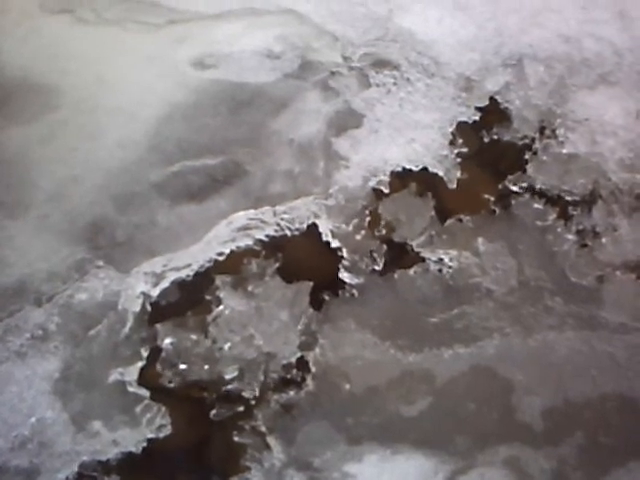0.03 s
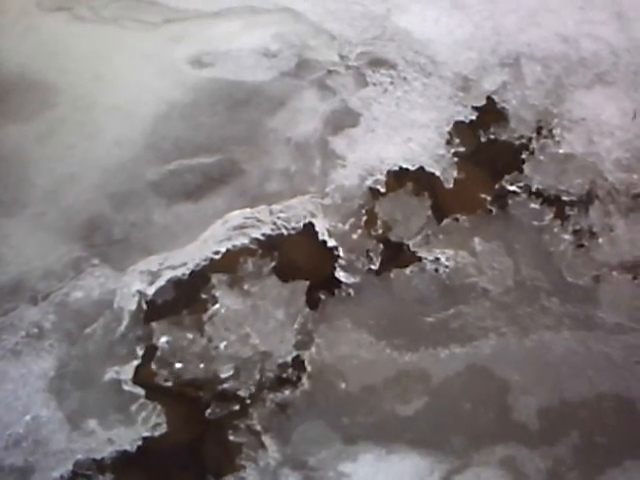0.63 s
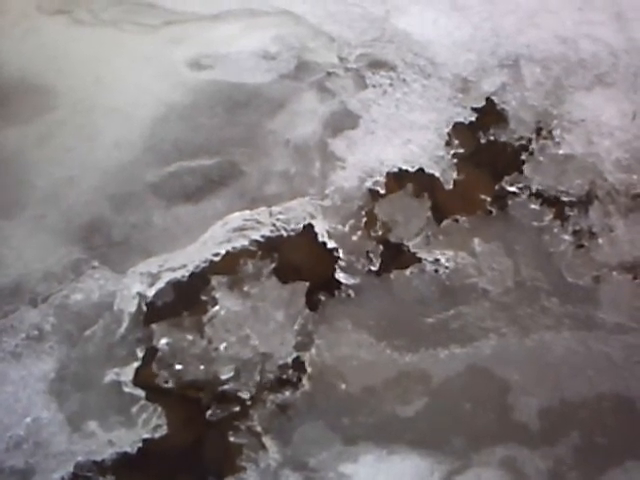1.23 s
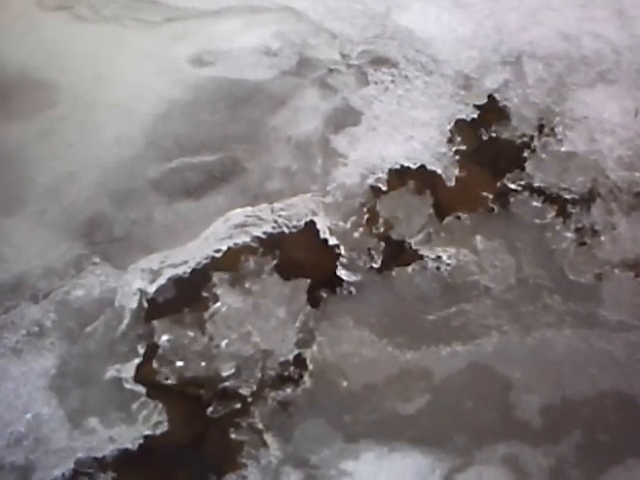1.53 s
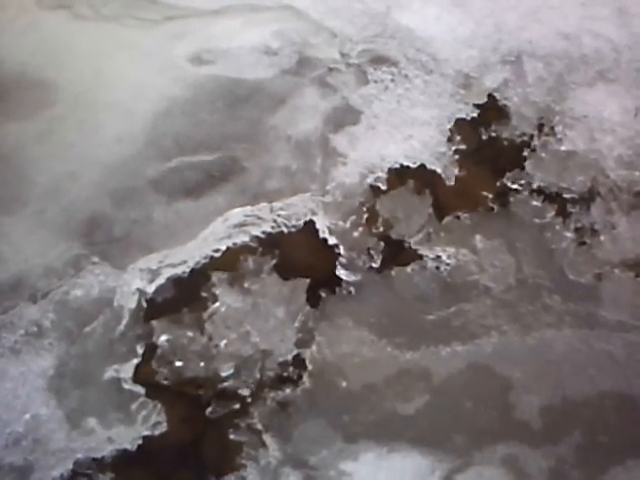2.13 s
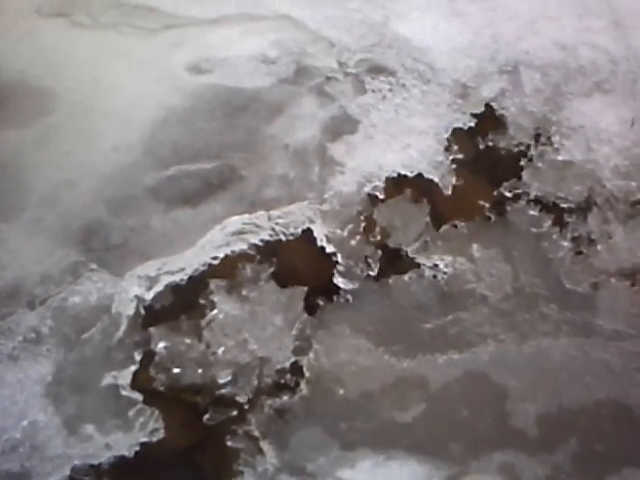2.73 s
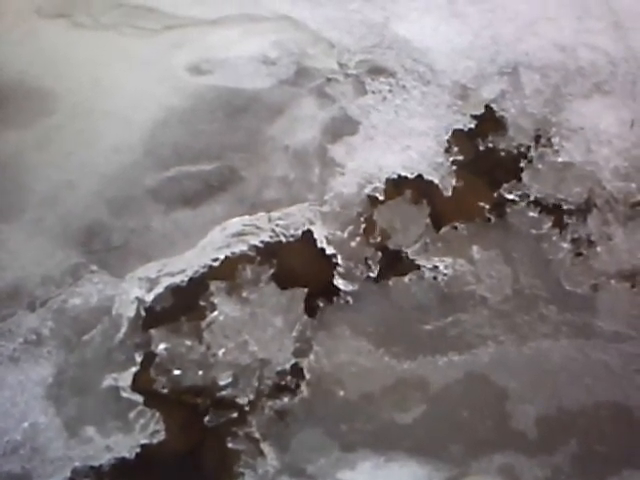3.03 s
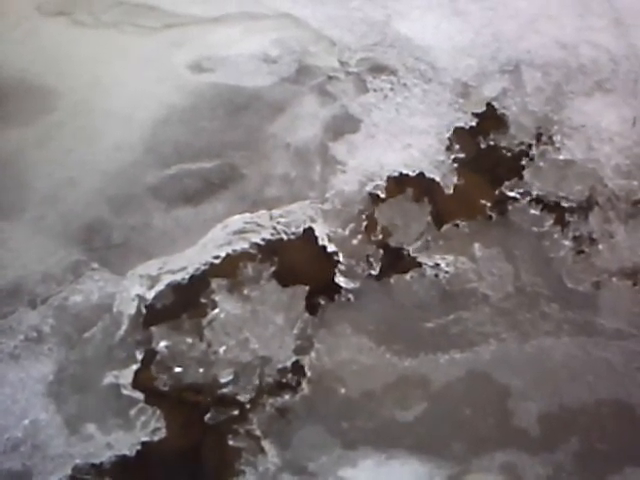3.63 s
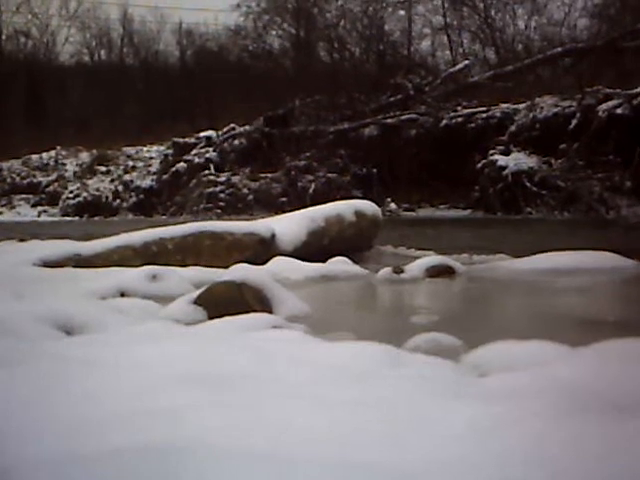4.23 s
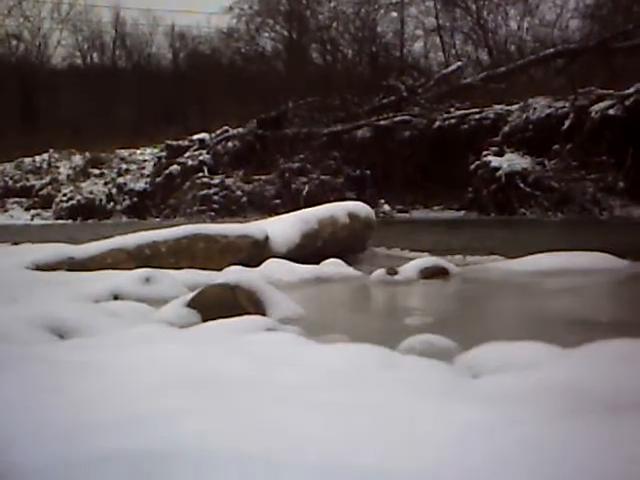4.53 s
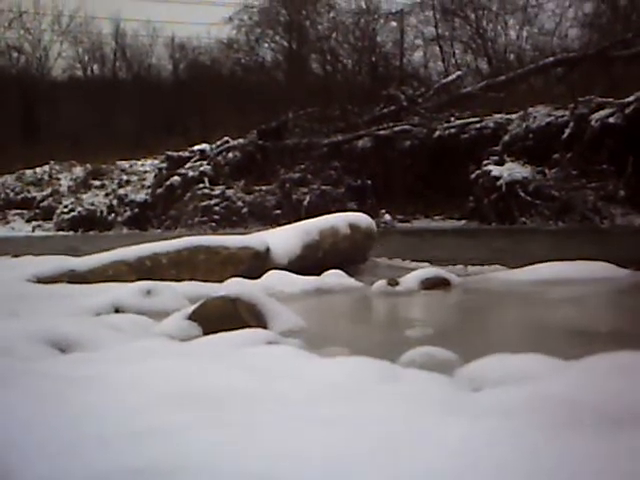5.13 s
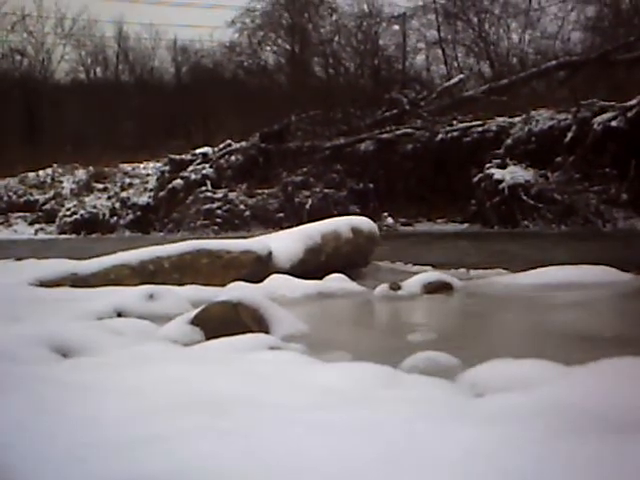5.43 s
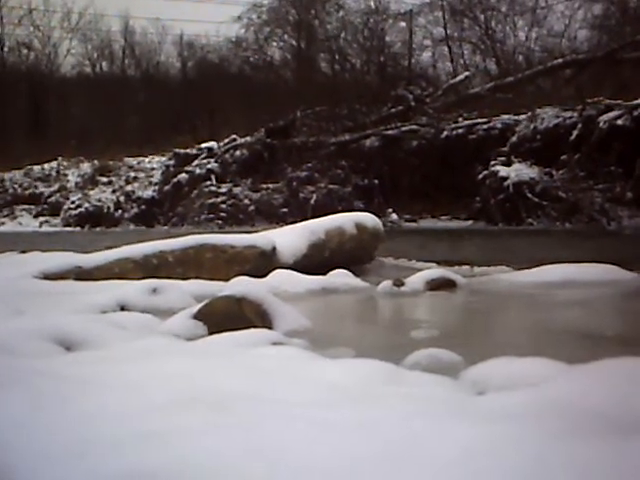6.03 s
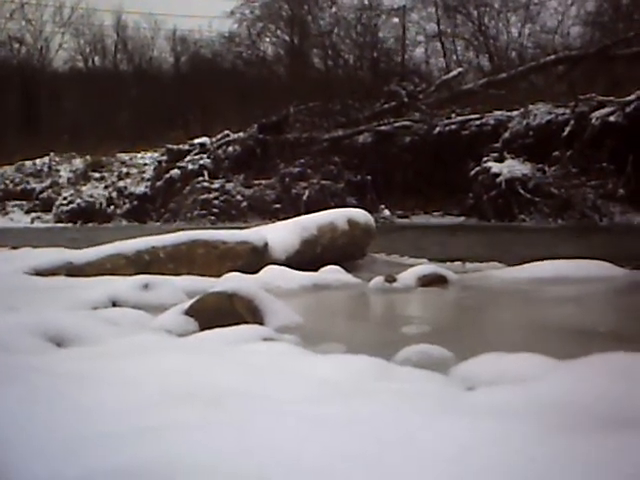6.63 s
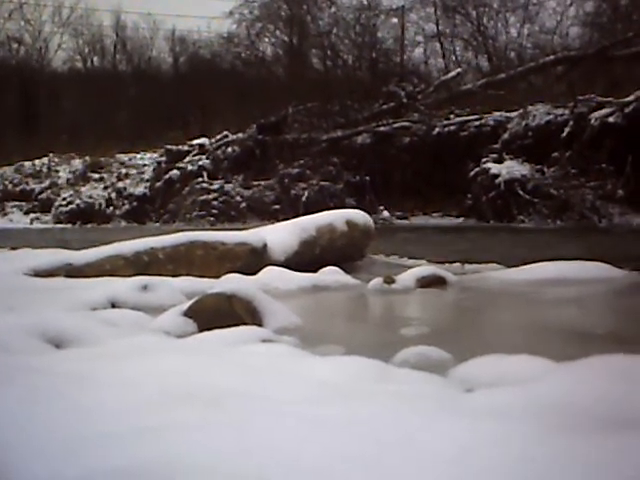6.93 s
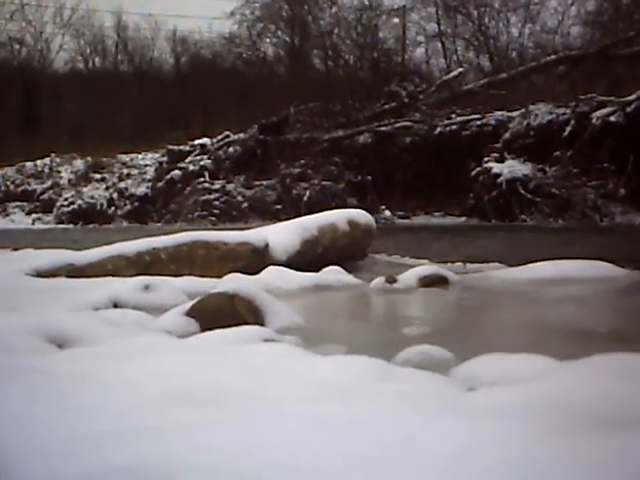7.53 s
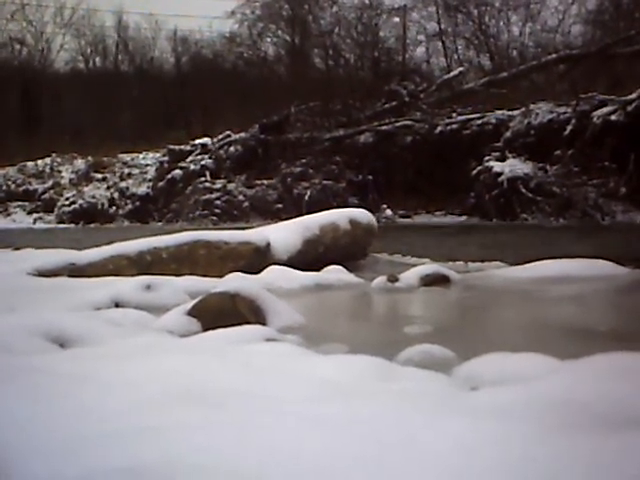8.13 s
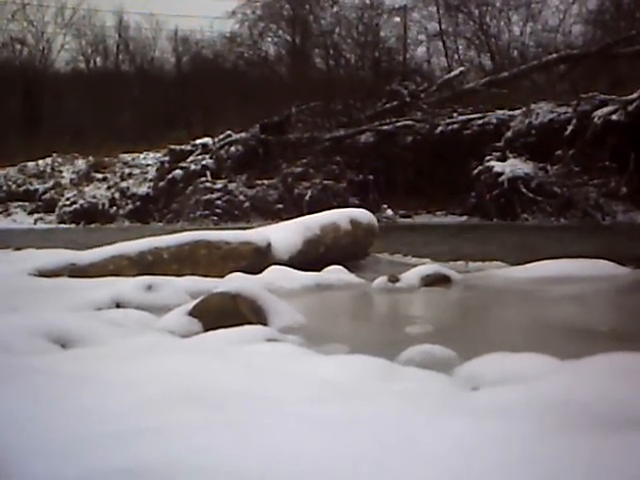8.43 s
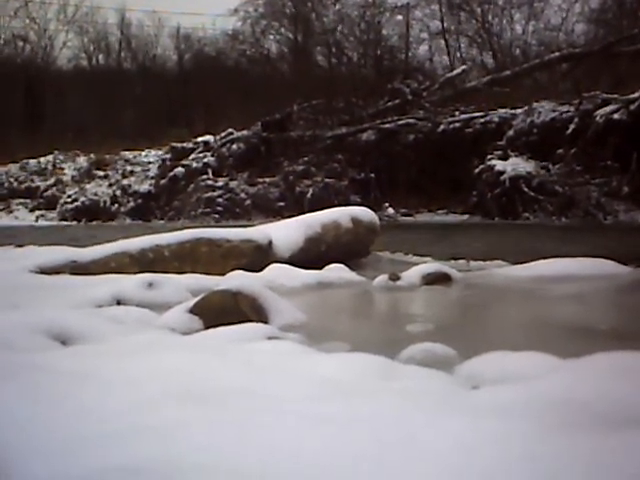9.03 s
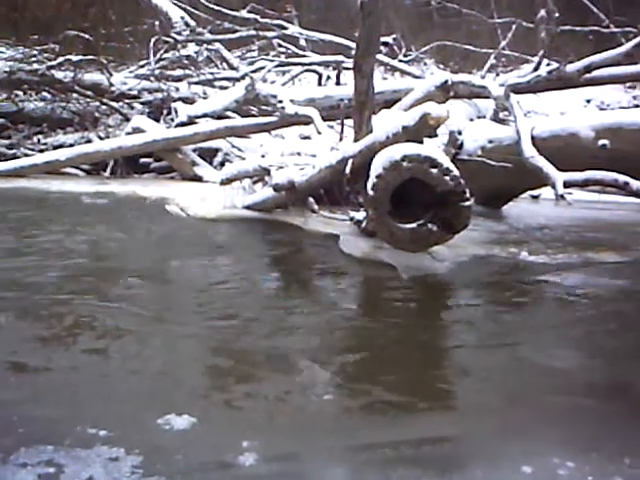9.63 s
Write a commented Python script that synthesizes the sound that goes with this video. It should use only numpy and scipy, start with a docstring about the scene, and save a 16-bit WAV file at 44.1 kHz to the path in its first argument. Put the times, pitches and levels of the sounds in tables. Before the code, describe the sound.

Soft, steady creek water is heard outdoors through a cheap mono microphone, with grainy hiss, faint rumble and a thin, fluttering electronic whine and buzz. At first, bright bubbles plink at an ice hole and a soft thump rocks the microphone. Then, from the snowy bank, come two sharp clicks and a more muffled gurgle with occasional low plops, before a brief, slightly brighter stretch of open water.

```python
"""A half-frozen creek, heard in mono from three places in turn: a hole in the ice, the snowy bank,
open water. Trapped air bubbles ring: near ones plink, swarms gurgle in a turbulent wash, tiny ones
fizz at the hole. Under them lie a low rumble and a faint drone. A cheap camera is bumped once and
clicks twice; its electronics whine, chirp and buzz, and its coarse converter adds a gritty hiss."""
import sys
import numpy as np
from scipy import signal
from scipy.fft import rfft, irfft, next_fast_len
from scipy.io import wavfile

SR = 44100
rng = np.random.default_rng(int(sys.argv[2]) if len(sys.argv) > 2 else 0)


def waveform_to_disk(signal):
    """Save audio, clipped to [-1, 1], as 16-bit WAV at the path in sys.argv[1]."""
    frames = np.transpose(np.atleast_2d(signal))
    scaled = np.clip(frames, -1, 1) * 32767
    samples = np.round(scaled).astype(np.int16)
    wavfile.write(sys.argv[1], SR, samples)


N = 435708
TIME = np.arange(N) / SR
BAND_LIMIT_HZ = 11500


def gain_of(db):
    """Decibels to gain."""
    return 10 ** (np.asarray(db) / 20)


def unit_rms(x):
    """Scales to rms 1."""
    return x / np.sqrt(np.mean(x ** 2) + 1e-20)


def coloured(x, spectrum):
    """Filters x by rows of (Hz, dB) on a log-frequency axis; rms 1."""
    size = next_fast_len(N, True)
    hz = np.fft.rfftfreq(size, 1 / SR)
    row_hz, row_db = np.transpose(spectrum)
    db = np.interp(np.log(hz + 1), np.log(row_hz + 1), row_db)
    return unit_rms(irfft(rfft(x, size) * gain_of(db), size)[:N])


def wander(bandwidth_hz):
    """Smooth random drift; rms 1."""
    size = next_fast_len(N, True)
    hz = np.fft.rfftfreq(size, 1 / SR)
    lowpass = np.exp(-(hz / bandwidth_hz) ** 2)
    return unit_rms(irfft(rfft(rng.standard_normal(size)) * lowpass, size)[:N])


def add(mix, start_s, sound):
    """Mixes a sound in at start_s."""
    part = mix[max(round(start_s * SR), 0):][:len(sound)]
    part += sound[:len(part)]


# Ice hole, bank, open water. Each row: start in seconds, first picture read-out in seconds,
# whine level in dB, chirp level in dB, chirp sweep in Hz per picture.
PLACES = [(0, 0.023, -55, -57.5, 303), (4.035, 4.0462, -55.5, -57.5, 490), (9.395, 9.427, -60.5, -57, 249)]

def place_index():
    """Row of PLACES at every sample."""
    return np.searchsorted([row[0] for row in PLACES[1:]], TIME)


# Rumble spectrum. Each row: frequency in Hz, relative density in dB.
RUMBLE_SPECTRUM = [(3, 5), (12, 1.5), (30, -1.5), (70, 0), (110, -8), (180, -14), (400, -46.5)]

def rumble(level_db=-48):
    """Low rumble and drift under everything."""
    return gain_of(level_db) * coloured(rng.standard_normal(N), RUMBLE_SPECTRUM)


# Drone envelope. Each row: time in seconds, level in dB.
DRONE_LEVELS = [(0, -60.5), (1.5, -58.5), (2.1, -54), (2.8, -52), (3.3, -61.5), (4.0, -76)]

def drone(hz=68, drift_hz=3):
    """A faint low tone near the ice hole wavers, swells and fades."""
    turns = np.cumsum(hz + drift_hz * wander(5)) / SR
    level_db = np.interp(TIME, *np.transpose(DRONE_LEVELS))
    return gain_of(level_db) * unit_rms(np.sin(2 * np.pi * turns))


# Chirp pitch, one list per place. Each row: time in seconds, Hz during a picture, Hz during read-out.
CHIRP_TRACKS = [
    [(0, 2029, 100.1), (4.035, 1510, 478.2)],
    [(4.035, 2135, 4100), (6.5, 2425, 4412), (9.4, 2722, 4670)],
    [(9.4, 4250, 6345), (9.88, 4344, 6470)],
]

def electronics(pictures_per_s=29.645, readout_share=.27, whine_hz=7235.1,
                jitter_hz=50, waver_db=1.57, buzz_db=-41, dip_share=.13):
    """Picture read-outs pull the supply down: a low buzz and a sweeping, jumping tone, over a whine."""
    place = place_index()
    _, first_readout_s, whine_db, chirp_db, sweep_hz = np.array(PLACES)[place].T
    cycle = ((TIME - first_readout_s) * pictures_per_s) % 1
    from_readout = np.minimum(cycle, 1 - cycle)
    supply_dip = np.exp(-(from_readout / dip_share) ** 2)
    tracks = [np.transpose(rows) for rows in CHIRP_TRACKS]
    picture_hz = np.choose(place, [np.interp(TIME, s, hz) for s, hz, _ in tracks])
    readout_hz = np.choose(place, [np.interp(TIME, s, hz) for s, _, hz in tracks])
    swept_hz = picture_hz + sweep_hz * (cycle - .5)
    chirp_hz = np.where(from_readout < readout_share / 2, readout_hz, swept_hz)
    turns = np.cumsum(chirp_hz + jitter_hz * wander(130)) / SR
    waver = gain_of(waver_db * wander(35))
    chirp = gain_of(chirp_db) * unit_rms(waver * np.sin(2 * np.pi * turns))
    whine = gain_of(whine_db) * unit_rms(np.sin(2 * np.pi * whine_hz * TIME))
    return chirp + whine - gain_of(buzz_db) * supply_dip


# Jolts of one bump. Each row: centre in seconds, envelope peak in dB, pitch in Hz, half-width in seconds.
BUMP_JOLTS = [(1.597, -29.5, 84, 0.0077), (1.6064, -25, 166, 0.0035), (1.617, -39.5, 100.6, .012)]

def bump():
    """A soft bump on the camera rocks its microphone."""
    out = np.zeros(N)
    for centre_s, db, hz, half_width_s in BUMP_JOLTS:
        t = TIME - centre_s
        out -= gain_of(db) * np.exp(-(t / half_width_s) ** 2) * np.sin(2 * np.pi * hz * t)
    return out


# Case modes. Each row: frequency in Hz, relative level in dB, t60 in seconds.
CASE_MODES = [(1110, -7, 0.025), (1325, -1, 0.014), (1980, -3, 0.0088), (3230, -4, 0.0059)]
# Clicks. Each row: start in seconds, peak in dB, contact time in seconds.
CASE_CLICKS = [(4.2813, -19.5, 0.00032), (4.7498, -24, 0.0009)]

def case_clicks(highpass_hz=850):
    """Two sharp clicks ring the camera's plastic case; a longer contact is duller."""
    out, t = np.zeros(N), np.arange(SR // 20) / SR
    ring = sum(gain_of(db - 60 * t / t60) * np.cos(2 * np.pi * hz * t) for hz, db, t60 in CASE_MODES)
    ring = signal.sosfilt(signal.butter(3, highpass_hz, "high", fs=SR, output="sos"), ring)
    for start_s, peak_db, contact_s in CASE_CLICKS:
        push = np.sin(np.pi * np.minimum(t / contact_s, 1)) ** 2
        click = signal.fftconvolve(ring, push)
        add(out, start_s, -gain_of(peak_db) * click / abs(click).max())
    return out


def bubble(hz, t60_s, rise_share):
    """A trapped pocket of air rings, its pitch rising as it nears the surface."""
    t = np.arange(int(max(t60_s, .002) * SR)) / SR
    envelope = gain_of(-60 * t / t60_s) * (1 - np.exp(-1.5 * hz * t))
    return envelope * np.sin(2 * np.pi * hz * t * (1 + rise_share * t / t60_s / 2))


def bubble_swarm(low_hz, high_hz, per_s, ring_cycles, spread_db, pitch_count=80):
    """Many small bubbles of random size and timing, a few standing out; rms 1."""
    out = np.zeros(N)
    # Small bubbles die fast, so amplitude scales with pitch.
    rings = [hz * bubble(hz, ring_cycles * rng.uniform(.5, 1.5) / hz, rise_share=rng.uniform(0, .25))
             for hz in np.geomspace(low_hz, high_hz, pitch_count)]
    for moment, pitch, strength in rng.random((int(per_s * N / SR), 3)):
        boost_db = spread_db * min(-np.log(1 - strength), 3)
        add(out, moment * N / SR, gain_of(boost_db) * rings[int(pitch * pitch_count)])
    return unit_rms(out)


def rim_fizz(level_db=-61):
    """Tiny bubbles burst at the rim of the ice hole, audible only there."""
    fizz = bubble_swarm(1400, 6000, per_s=220, ring_cycles=32, spread_db=2.5, pitch_count=40)
    return gain_of(level_db) * fizz * (place_index() == 0)


# Steady flow level in dB at the ice hole, the bank and open water.
FLOW_DB = [-48.2, -49.5, -47.5]
# Surges and lulls. Each row: centre in seconds, change in dB, half-width in seconds.
FLOW_SURGES = [(5.1, -0.8, .15), (5.37, 1.5, .09), (6.15, 3.5, .16), (6.561, -3, .13), (6.8, -2, .07),
               (7.207, 1.9, .11), (7.418, -1.5, .05)]

def flow_db(flutter_db=.63):
    """Strength of the current: a level per place, slow surges and a quick flutter."""
    surges_db = sum(db * np.exp(-((TIME - centre_s) / half_width_s) ** 2)
                    for centre_s, db, half_width_s in FLOW_SURGES)
    return np.array(FLOW_DB)[place_index()] + surges_db + flutter_db * wander(13)


# Water colour, one table per place. Each row: frequency in Hz, relative gain in dB.
ICE_HOLE_EQ = [(120, -15), (220, -1.5), (300, -1.5), (450, 1), (880, 2), (1300, -4), (2000, -11.5),
               (3000, -20), (5500, -25), (9000, -32.5)]
BANK_EQ = [(120, -14.5), (220, -3.5), (300, -4), (380, -1.4), (550, 0.5), (750, -1.2), (920, -1),
           (1100, -8.5), (1800, -15.5), (3500, -24.5), (9000, -37.5)]
OPEN_WATER_EQ = [(120, -10), (220, 0), (450, 1.5), (950, 4), (1400, -2), (2100, -9.5), (4000, -21),
                 (9000, -33)]

def creek(wash_weight_db=-2, gurgle_weight_db=-5):
    """Bubbles gurgle in a wash of turbulence, coloured by the place and driven by the flow."""
    gurgle = bubble_swarm(240, 6000, per_s=1400, ring_cycles=24, spread_db=3.5)
    water = gain_of(wash_weight_db) * rng.standard_normal(N) + gain_of(gurgle_weight_db) * gurgle
    by_place = [coloured(water, eq) for eq in (ICE_HOLE_EQ, BANK_EQ, OPEN_WATER_EQ)]
    return np.choose(place_index(), by_place) * gain_of(flow_db())


def plink(hz, gain_db, t60_at_1khz_s=.05, swell_cycles=1.6, splash_t60_s=.013, splash_octaves=.6):
    """A near bubble breaks off with a tiny splash; smaller ones ring higher and die sooner."""
    ring = bubble(hz, t60_at_1khz_s * (1000 / hz) ** .8, rise_share=.17)
    t = np.arange(len(ring)) / SR
    swell = 1 - np.exp(-hz * t / swell_cycles)
    band_hz = np.minimum(hz * 2. ** np.array([-splash_octaves, splash_octaves]), BAND_LIMIT_HZ)
    bandpass = signal.butter(2, band_hz, "band", fs=SR, output="sos")
    splash = unit_rms(signal.sosfilt(bandpass, rng.standard_normal(SR)))[:len(t)]
    splash_db = -15 + 2.5 * np.log2(hz / 1000) - 60 * t / splash_t60_s  # smaller bubbles splash more
    return gain_of(gain_db) * (ring * swell + gain_of(splash_db) * splash)


# Loudest near bubbles. Each row: start in seconds, pitch in Hz, gain in dB.
NEAR_BUBBLES = [(0.141, 5460, -35), (0.347, 887, -28.5), (0.36, 1117, -35.5), (0.369, 643, -35.5),
                (0.452, 1946, -34.5), (0.483, 4400, -36.5), (0.558, 752, -34), (0.693, 4100, -37.5),
                (0.786, 1022, -34.5), (1.102, 5360, -29.5), (1.166, 2160, -33.5), (1.561, 637, -37),
                (1.661, 5140, -35), (1.734, 3799, -36), (2.033, 1217, -37.5), (2.144, 904, -35),
                (2.448, 4300, -32.5), (2.685, 3898, -36.5), (2.94, 3920, -35), (2.975, 1890, -36.5),
                (3.022, 1265, -35.5), (3.273, 906, -33), (3.333, 4380, -36.5), (3.745, 1150, -32),
                (3.765, 5770, -32.5), (3.767, 2760, -35), (3.804, 1806, -32), (3.87, 1730, -36),
                (4.329, 980, -37.5), (4.911, 349, -38), (5.309, 493, -33), (5.93, 273, -37),
                (6.032, 610, -35), (6.293, 560, -31.5), (7.691, 421, -32.5), (7.915, 650, -34),
                (8.006, 264, -38.5), (8.028, 763, -33.5), (8.586, 363, -36.5)]
# Fainter bubbles at the ice hole, then the bank. Each row: count per second, lowest pitch in Hz,
# highest pitch in Hz, mean gain in dB.
STRAY_BUBBLES = [(9, 1100, 5800, -41.5), (1.5, 300, 900, -41)]

def plinks(spread_db=5):
    """Single bubbles close by: loud ones at set times, fainter ones at random."""
    out = np.zeros(N)
    for start_s, hz, db in NEAR_BUBBLES:
        add(out, start_s, plink(hz, db))
    for (per_s, low_hz, high_hz, db), here, following in zip(STRAY_BUBBLES, PLACES, PLACES[1:]):
        start_s, stay_s = here[0], following[0] - here[0]
        for moment, pitch, strength in rng.random((int(per_s * stay_s), 3)):
            hz = low_hz * (high_hz / low_hz) ** pitch
            add(out, start_s + moment * stay_s, plink(hz, db + spread_db * (strength - .5)))
    return out


def scene():
    """Water, low background and the camera's own noises, in mono."""
    bed = creek() + rim_fizz() + rumble() + drone()
    camera = case_clicks() + bump() + electronics()
    return (bed + camera + plinks())[None]


# Hiss after the converter. Each row: frequency in Hz, relative density in dB.
HISS_SPECTRUM = [(100, -3), (2000, -0.5), (4500, -6), (7500, -6.5), (11000, -2.5), (13000, -1.5)]

def record(dry, step=1 / 64, bias=-.0008, offset_steps=-9, input_hiss_db=-53, output_hiss_db=-54.5):
    """A coarse converter averages three noisy readings, turning quiet sound gritty; then a low-pass."""
    readings = dry + bias + gain_of(input_hiss_db) * rng.standard_normal(size=(3, N))
    stepped = step * np.round(readings / step).mean(axis=0, keepdims=True)
    hiss = gain_of(output_hiss_db) * coloured(rng.standard_normal(N), HISS_SPECTRUM)
    lowpass = signal.firwin(141, BAND_LIMIT_HZ, window=("kaiser", 7), fs=SR)
    return signal.oaconvolve(stepped + hiss, lowpass[None], "same") + offset_steps * step


dry = scene()
out = record(dry)
waveform_to_disk(out)
```